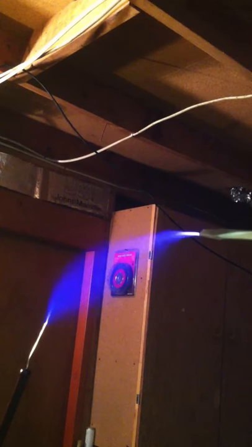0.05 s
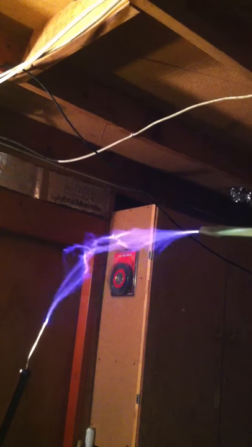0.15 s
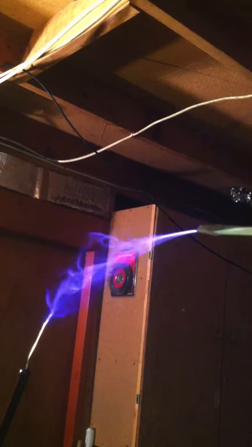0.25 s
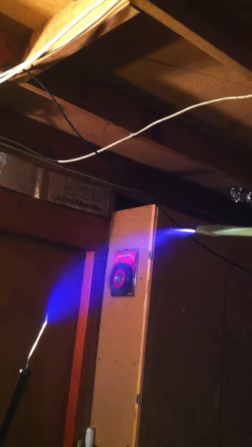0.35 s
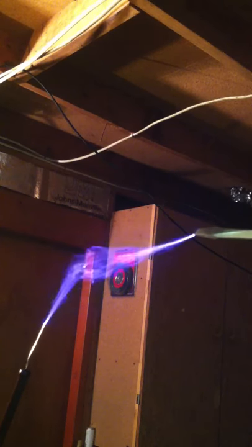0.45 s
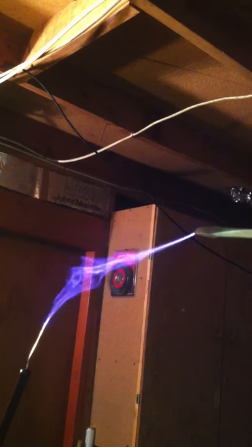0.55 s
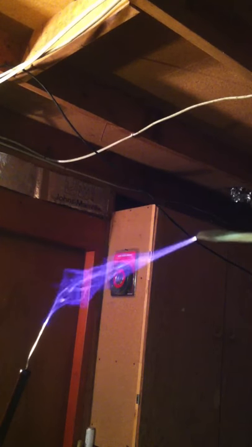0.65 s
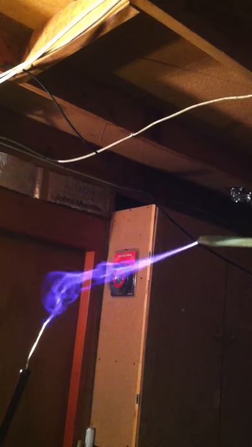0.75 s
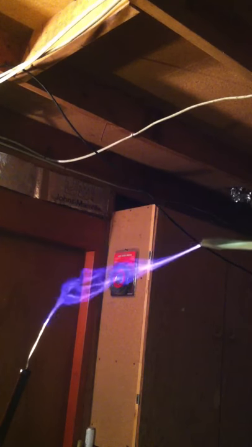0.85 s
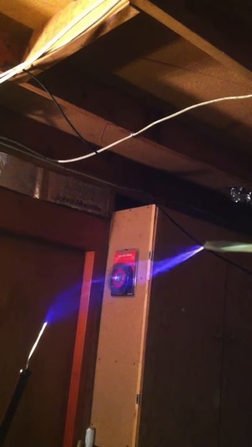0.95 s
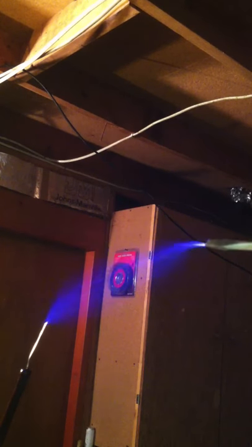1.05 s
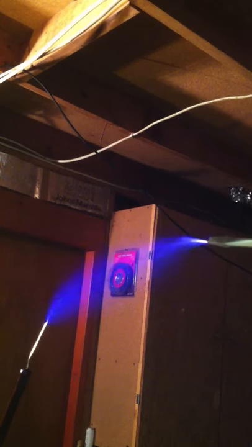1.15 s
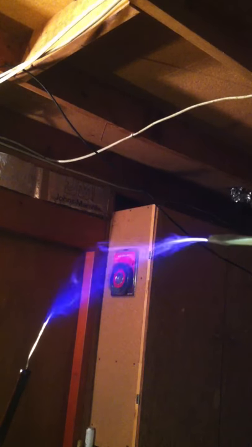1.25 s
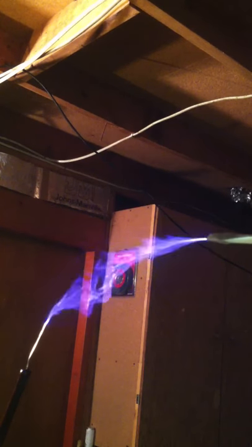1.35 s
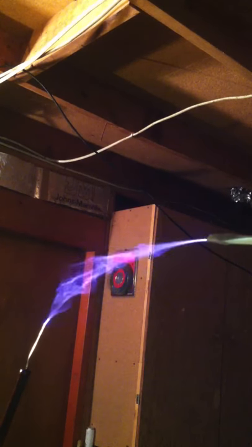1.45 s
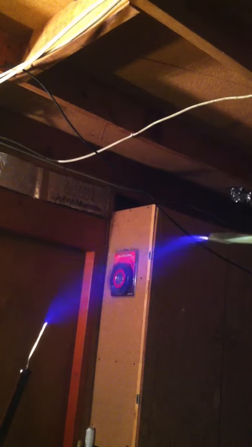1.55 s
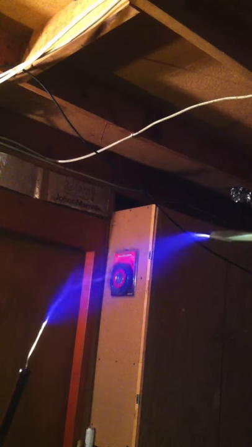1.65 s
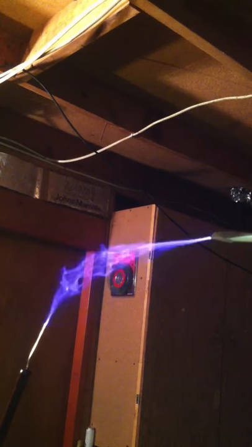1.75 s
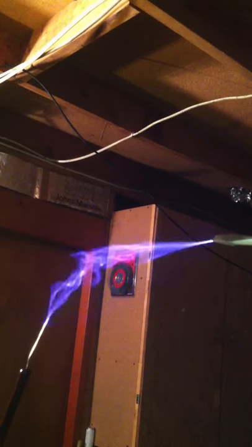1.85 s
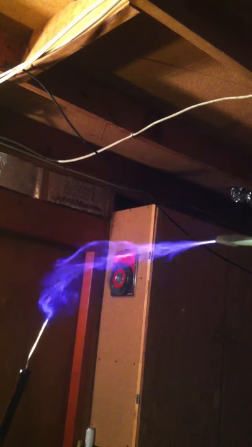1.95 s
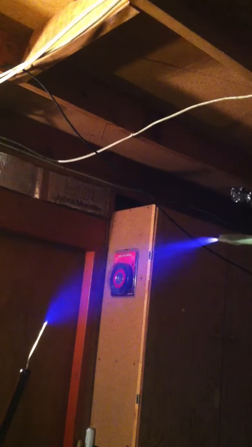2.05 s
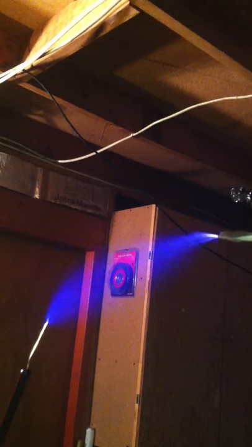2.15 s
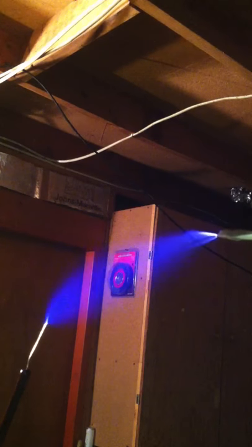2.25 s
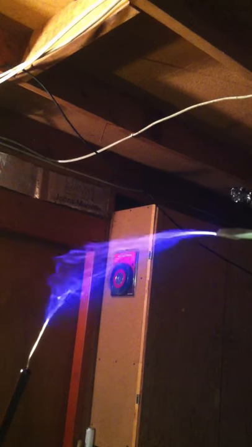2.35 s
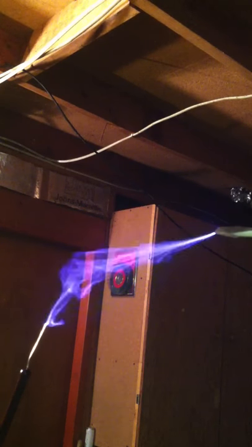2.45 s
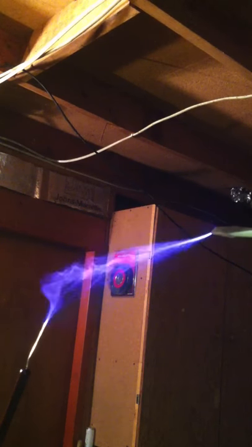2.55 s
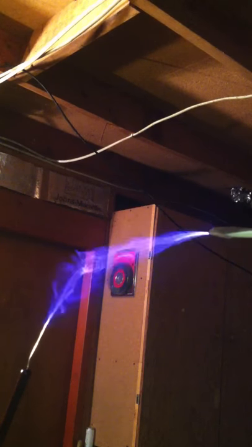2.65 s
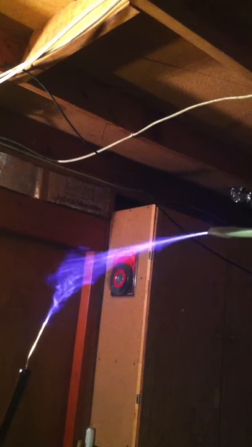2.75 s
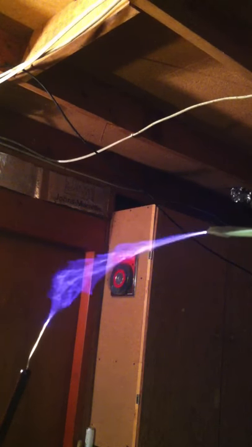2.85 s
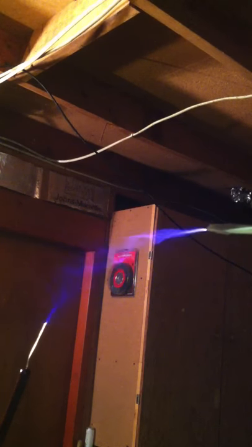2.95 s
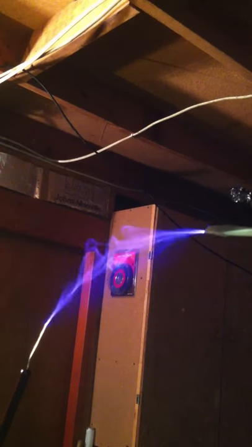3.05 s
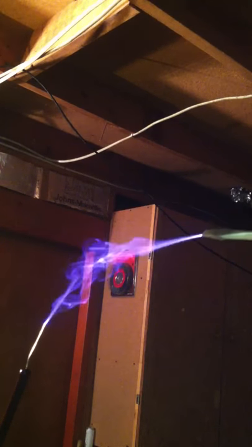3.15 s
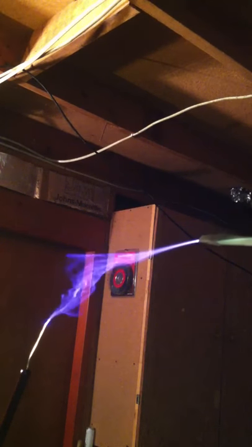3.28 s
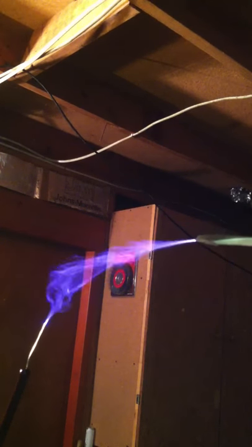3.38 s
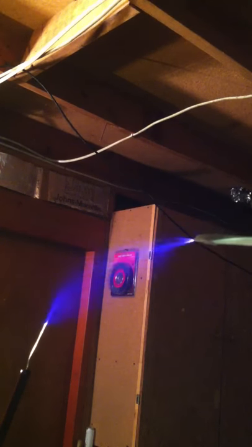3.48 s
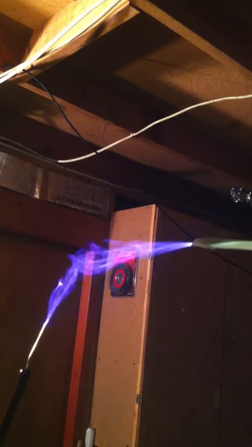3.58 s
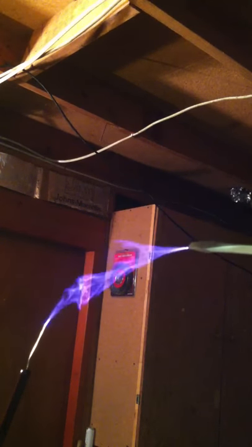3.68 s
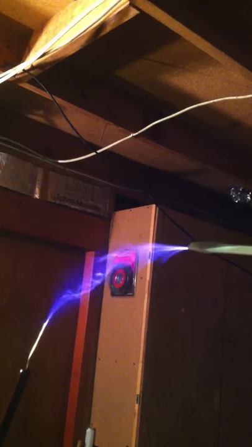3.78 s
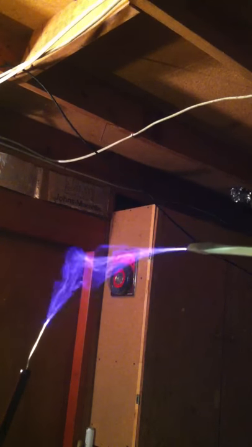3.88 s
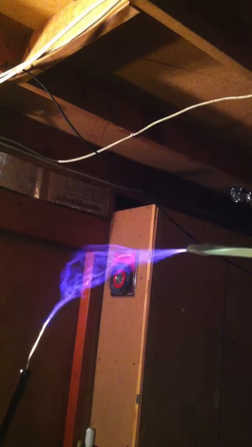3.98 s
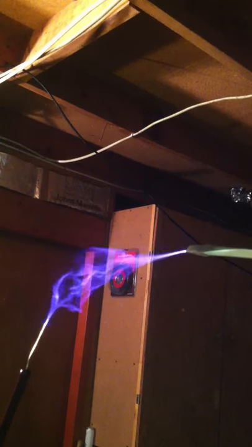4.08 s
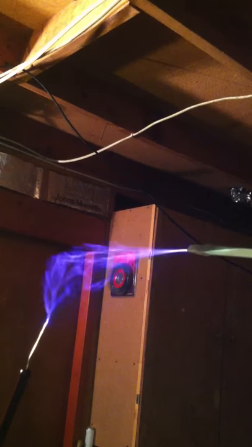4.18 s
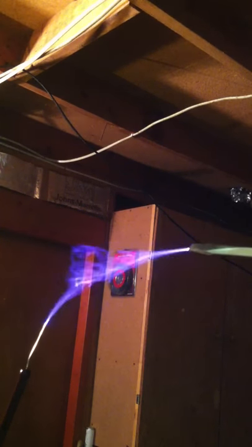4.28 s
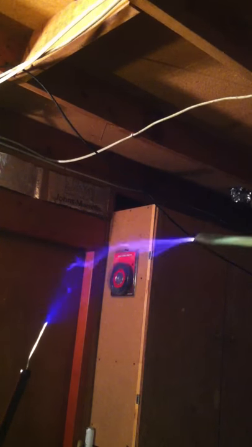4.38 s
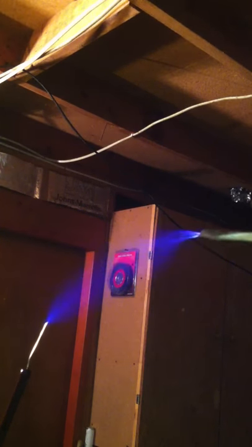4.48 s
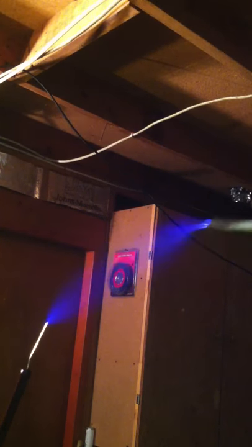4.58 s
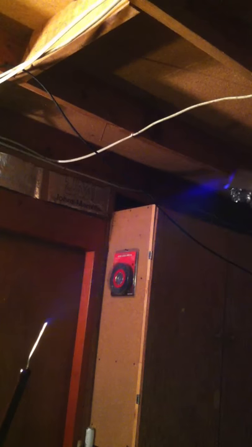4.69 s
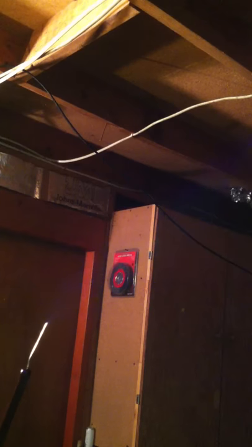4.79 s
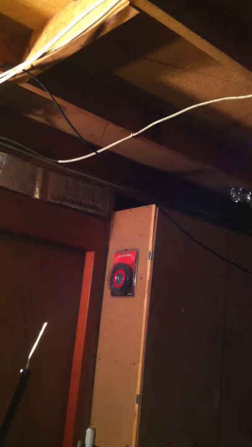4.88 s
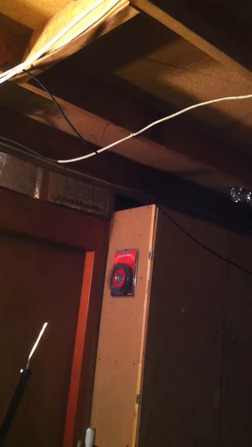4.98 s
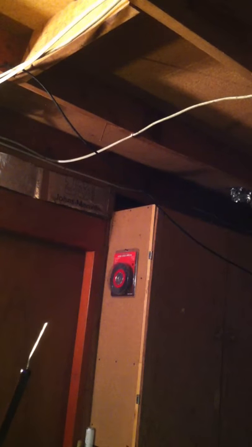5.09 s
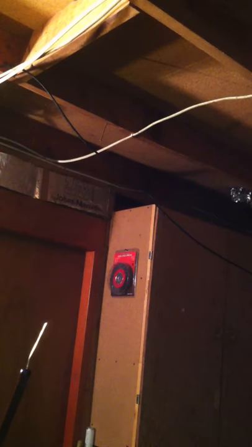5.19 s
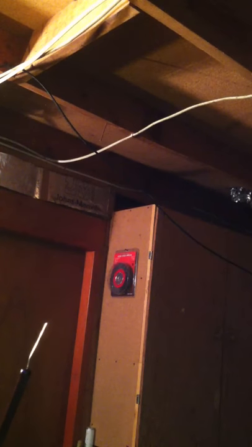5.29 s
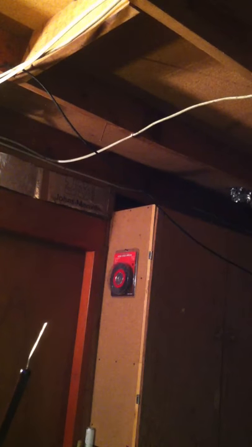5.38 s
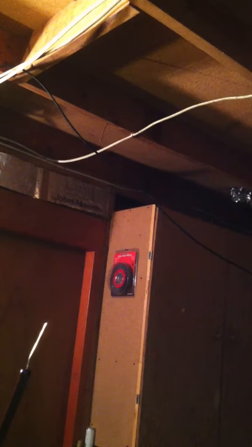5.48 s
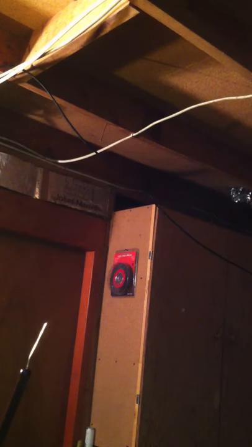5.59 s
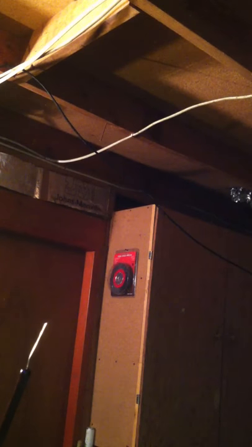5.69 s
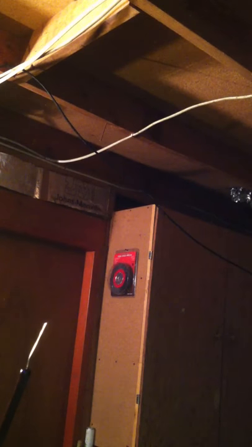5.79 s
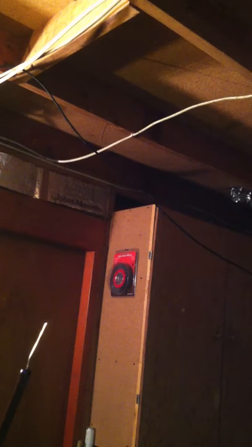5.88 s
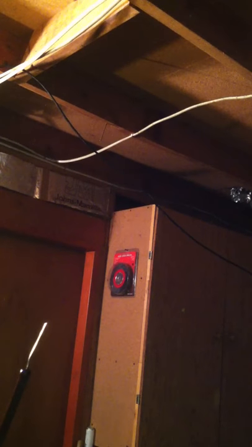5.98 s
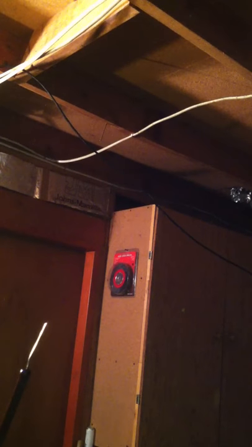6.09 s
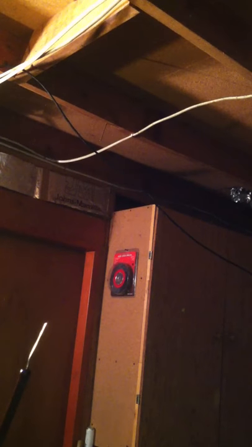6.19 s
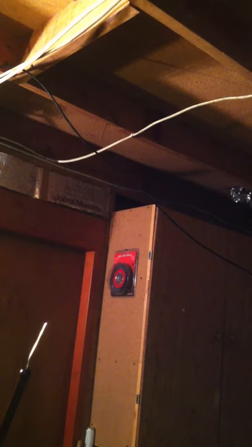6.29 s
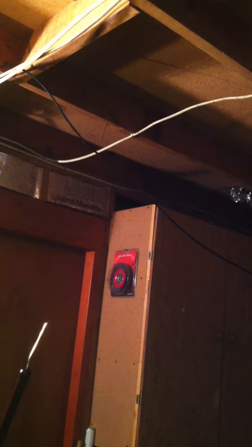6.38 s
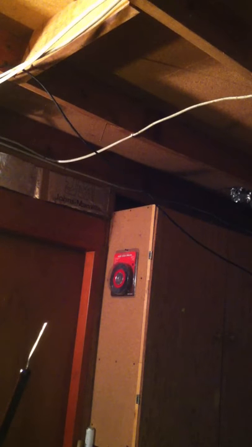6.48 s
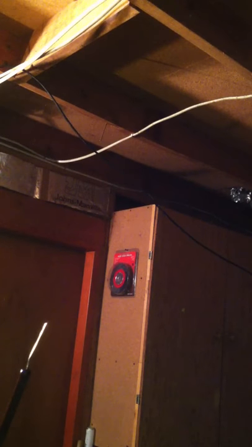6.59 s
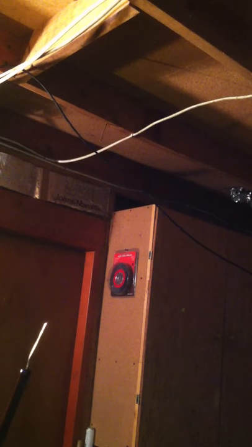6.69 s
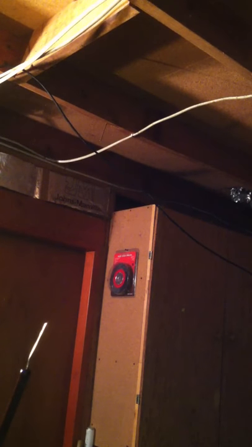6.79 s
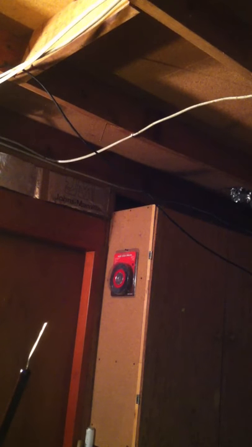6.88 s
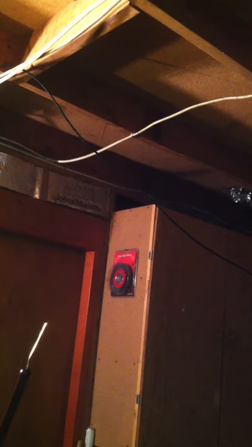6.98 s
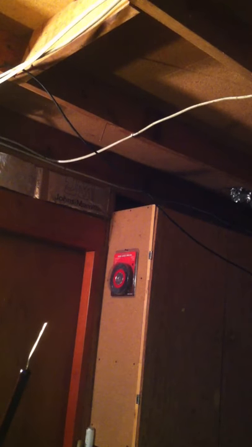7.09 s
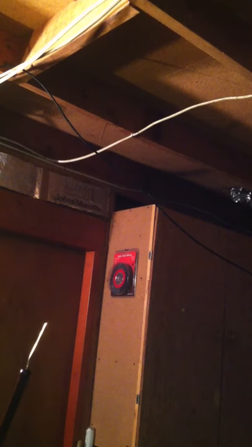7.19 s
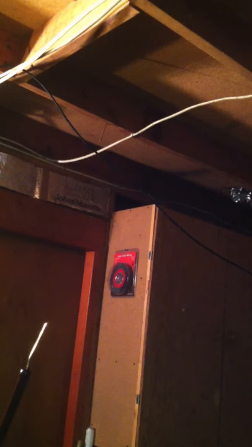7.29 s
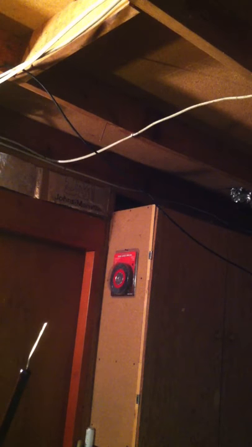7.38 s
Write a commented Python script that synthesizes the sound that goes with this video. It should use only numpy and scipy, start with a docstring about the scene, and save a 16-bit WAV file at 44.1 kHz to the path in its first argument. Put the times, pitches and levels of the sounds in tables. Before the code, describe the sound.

A high-voltage arc plays close to the microphone in a timber basement, over a quiet, slightly wavering fan whirr, soft air noise and thin mains buzz. From 0 to 0.55 s, quick ripping zaps tumble together with gritty sizzle and snaps. It drops to faint fizz and stray ticks, then a burn from 1.04 swells, throbbing at mains rate, and snaps off at 1.3. Dense, loud rips and crackling follow until 1.93; another burn runs 2.06 to 2.46, then a tight cluster of zaps until 2.8. Separate sizzling burns start around 3.04, 3.54, 3.9, 4.2 and 4.5, with sharp snaps and soft air thumps. The last collapses at 4.7. At 4.83 a smooth hiss flares and quickly sinks to a whisper, with a faint tick at 5.3, fading out just after 5.45. Only the fan and buzz remain until about 7.5 s. Echoes are short and dull.

```python
"""Timber basement: a high-voltage discharge between a fixed rod and a hand-held probe, over a fan and mains hum.
At first flash-overs rip for a few ms, as rushes of small shocks, each with a soft thump of pushed air.
Between them a brush of streamers sizzles, a bed of finer shocks throbbing with the mains ripple, and ends in snaps.
Late on the probe is drawn away: a hiss of filtered noise flares, sinks to a whisper with a faint tick, and stops.
Fan tones, air noise and a thin buzz run from start to end; a close surface and the room return echoes."""
import sys
import numpy as np
from scipy import signal
from scipy.fft import rfft, irfft
from scipy.io import wavfile
from scipy.ndimage import uniform_filter1d

SR = 44100
rng = np.random.default_rng(int(sys.argv[2]) if len(sys.argv) > 2 else 0)


def to_wav(s):
    """Save 16-bit WAV."""
    ch = np.atleast_2d(s).T  # columns
    pcm = np.round(np.clip(ch, -1, 1) * 32767)  # PCM
    wavfile.write(sys.argv[1], SR, pcm.astype(np.int16))


N = 328104
TIME = np.arange(N) / SR
MAINS_HZ, FAN_HZ = 60, 43.83  # ripple rate; fan shaft turns per second
TOP_HZ = 15800  # upper edge of the microphone channel

# Fan tones, as orders of the shaft: order [multiple of FAN_HZ], level_db [dB rms]
FAN_ORDERS = [(4, -73), (5, -67), (6, -59), (8, -70.5), (10, -58.5), (12, -66), (14, -70.5)]
# Mains buzz: harmonic [multiple of MAINS_HZ], level_db [dB rms]
BUZZ_HARMONICS = [(14, -70), (20, -75), (28, -74.5)]
# Spectrum of the fan's rush of air: pitch_hz [Hz], density_db [dB per Hz, relative]
AIR_SPECTRUM = [(25, -32.5), (60, -30), (110, -15), (190, -5.5), (260, -2), (420, -1.5), (570, -7),
                (880, -6), (1150, -11.5), (1700, -12), (2200, -15.5), (5000, -23), (10000, -28.5),
                (15500, -29.5)]
# Spectrum of the hiss of the leaving probe: pitch_hz [Hz], density_db [dB per Hz, relative]
CORONA_SPECTRUM = [(100, -31), (1200, -8), (2000, -5), (4000, -1), (8000, -1.5), (15500, -5.5)]
# Spectrum of sparks, ticks and crackle: pitch_hz [Hz], density_db [dB per Hz, relative]
SNAP_SPECTRUM = [(25, -13.5), (110, -9.5), (300, 4.5), (1200, -0.5), (4000, 1.5), (8000, 3), (12000, 0.5),
                 (15500, -14)]
# Spectrum of the streamer brush: pitch_hz [Hz], density_db [dB per Hz, relative]
BRUSH_SPECTRUM = [(25, -26.5), (130, -14.5), (210, -0.5), (470, 4.5), (720, -1.5), (1150, 2.5), (1600, 1),
                  (2150, 1.5), (3200, -0.5), (5500, 4.5), (9000, 4), (15500, 1.5)]
# Spectrum of the flash-overs: pitch_hz [Hz], density_db [dB per Hz, relative]
STRIKE_SPECTRUM = [(25, -17), (120, -15.5), (220, -5.5), (450, 0.5), (720, -3), (1150, 0), (2100, -1.5),
                   (3200, -5), (5000, -1), (9000, 2), (15500, 3.5)]
# Faint fizz of the tips between burns: start_s [s], level_db [dB]
IDLE_FIZZ = [(0, -52.5), (.9, -61.5), (3.2, -59), (4.15, -54), (4.45, -72), (4.85, -54.5), (5.1, -82)]
# Loud stray sparks: start_s [s], level_db [dB, relative]
STRAY_SPARKS = [(.2795, -16), (.627, -14.5), (.6917, -24), (.7092, -23.5), (.7497, -22), (.7604, -20),
                (1.1466, -15), (1.4103, -9.5), (2.8546, -14.5), (2.8704, -22), (2.9638, -20.5),
                (3.129, -17), (3.2259, -18), (3.2405, -19), (3.2652, -17.5), (3.329, -25), (3.4436, -27),
                (3.716, -20), (3.8241, -26), (3.9975, -19.5), (4.0098, -17), (4.0452, -20)]
# Burns of the brush, each lit by the first flash-over after the last collapse:
# collapse_s [s], final_db [dB], throb [0-1], closing_snap_db [dB, relative], embers_db [dB against the burn]
BRUSH_BURNS = [(.222, -34, .1, -30, -7), (.3581, -34, .1, -14, -11), (.5308, -35, 0, -14, -7.5),
               (1.2962, -36, 0.9, -9, -33), (1.445, -37.5, 0.3, -30, -9.5), (1.781, -35.5, .7, -10, -16.5),
               (1.824, -39, .6, -14.5, -13), (1.9291, -37.5, 0.65, -7.5, -2),
               (2.4632, -32.5, 0.5, -9.5, -23), (2.5269, -35, .05, -4.5, -8), (2.664, -32.5, .05, -9, -20),
               (2.7397, -41, .05, -13, -12), (2.8102, -38, 0.2, -16, -7), (3.1768, -38, 1, -12, -6),
               (3.6463, -37.5, .45, -8, -6), (3.965, -36.5, .35, -30, -5.5), (4.2765, -36.5, 0.4, -11, -13),
               (4.3774, -43, 0, -18.5, -15), (4.705, -40.5, 1, -35, -6)]
# Flash-overs, and last a faint tick after the probe has left:
# start_s [s], length_s [s], level_db [dB, relative], body_db [dB, leaning to body or treble]
STRIKES_AND_TICK = [(.029, 0.0099, -23, -2), (.1415, 0.0025, -20.5, -2.5), (0.2153, .0076, -23.5, -3.5),
                    (0.337, 0.0068, -23, -1), (0.399, 0.0069, -22, -2), (.412, 0.003, -20, -1.5),
                    (1.037, .0075, -19.5, -7.5), (1.334, .016, -19, -5.5), (1.393, 0.005, -16.5, -4),
                    (1.4398, .0012, -18.5, 0), (1.601, 0.016, -20, -16), (1.786, 0.0042, -17, -7),
                    (1.854, 0.014, -14.5, -10.5), (2.062, 0.0036, -15.5, -8.5), (2.485, 0.01, -18.5, -8.5),
                    (2.578, 0.0034, -18, -7), (2.593, 0.0045, -28.5, 3), (2.603, 0.0062, -19.5, -0.5),
                    (2.697, 0.0053, -22, 2.5), (2.711, .003, -22.5, -1), (2.752, 0.016, -19, -7),
                    (3.036, 0.008, -19.5, -10.5), (3.542, 0.0074, -20, -6.5), (3.885, 0.011, -19, -4.5),
                    (3.96, 0.0029, -22, 0), (4.2, 0.016, -21, -6.5), (4.32, 0.011, -21.5, -6.5),
                    (4.5, 0.0067, -21, -16.5), (5.32, 0.0081, -50.5, -18)]


def undb(db):
    """Decibels to gain."""
    return 10 ** (np.asarray(db) / 20)


def unit(x):
    """Scale to rms 1."""
    return x / np.sqrt(np.mean(x ** 2))


def curve(rows):
    """Join (start_s, value) rows with straight lines."""
    return np.interp(TIME, *np.transpose(rows))


def walk(rate):
    """Smooth random wander with a spread near 1, from steps drawn at this rate in Hz."""
    k = int(SR / rate)
    steps = np.repeat(rng.standard_normal(N // k + 1), k)
    return 1.33 * uniform_filter1d(uniform_filter1d(steps, k), k)[:N]


def lowpass(x, hz):
    """Gentle two-pole low-pass."""
    return signal.sosfilt(signal.butter(2, min(hz, SR / 2 - 1), fs=SR, output="sos"), x)


def highpass(x, hz):
    """Gentle two-pole high-pass."""
    return signal.sosfilt(signal.butter(2, hz, "highpass", fs=SR, output="sos"), x)


def colour(x, points, size=4096):
    """Causal filter through (pitch_hz, density_db) points that keeps the power of white noise."""
    hz, db = np.transpose(points)
    f = np.maximum(np.fft.rfftfreq(size, 1 / SR), 1)
    gain = undb(np.interp(np.log(f), np.log(hz), db))
    # folding the cepstrum gives minimum phase: the response starts at once
    cepstrum = irfft(np.log(gain))
    cepstrum[1:size // 2] *= 2
    cepstrum[size // 2 + 1:] = 0
    response = irfft(np.exp(rfft(cepstrum)))
    return signal.fftconvolve(x, response / np.linalg.norm(response))[:N]


def clicks(rate, spread_db):
    """Tiny shocks of uneven size and sign at random moments, so many a second; rms 1."""
    fired = rng.random(N) < rate / SR
    size = undb(spread_db * np.clip(rng.standard_normal(N), -2, 2))
    return unit(fired * size * rng.choice([-1, 1], N))


def hum(air_db=-56.5, waver_db=1.0, wow=0.001984):
    """A fan whose tones swell and waver over its rush of air, and a thin mains buzz."""
    turns = np.cumsum(FAN_HZ * (1 + wow * walk(5))) / SR
    tones = np.zeros(N)
    for order, level_db in FAN_ORDERS:
        phase = 2 * np.pi * (order * turns + rng.random())
        tones += undb(level_db + waver_db * walk(10)) * np.sin(phase)
    for harmonic, level_db in BUZZ_HARMONICS:
        phase = 2 * np.pi * (harmonic * MAINS_HZ * TIME + rng.random())
        tones += undb(level_db + waver_db * walk(4.1)) * np.sin(phase)
    air = colour(rng.standard_normal(N), AIR_SPECTRUM) * undb(0.36 * walk(8))
    return np.sqrt(2) * tones + undb(air_db) * air  # root 2 turns rms into sine peak


def corona(start_s=4.825, rise_s=.02, peak_db=-43.5, fall_db_per_s=75, faint_db=-66.0,
           off_s=5.45, release_s=0.14):
    """A smooth hiss flares as the probe leaves and sinks to a faint whisper, which then stops."""
    age = np.maximum(TIME - start_s, 0)
    level = np.hypot(undb(peak_db - fall_db_per_s * age), undb(faint_db))
    gate = np.minimum(age / rise_s, 1) * np.exp(-np.maximum(TIME - off_s, 0) / release_s)
    return colour(rng.standard_normal(N), CORONA_SPECTRUM) * level * gate


def puffs(strength, swell_s=.012, puff_hz=85, puff_db=-54.0, churn_db=-39.5, churn_hz=100):
    """Each discharge pushes air aside with a soft low thump; the hot air churns while the brush burns."""
    out = undb(churn_db) * strength * unit(lowpass(rng.standard_normal(N), churn_hz))
    age = TIME[:SR // 8] / swell_s
    for start_s, _, level_db, _ in STRIKES_AND_TICK:
        eddies = lowpass(rng.standard_normal(len(age)) * age * np.exp(-age), puff_hz)
        first = max(int((start_s - swell_s) * SR), 0)
        out[first:first + len(age)] += undb(level_db + puff_db) * unit(eddies)
    return out


def snaps(snap_db=3.0, width_s=.000012, tick_db=-57.0, spit_db=-52.0, spit_hz=2300, stray_db=-62.0):
    """Stray and burn-ending sparks, each a shock of its own width; small sputter goes on near the probe."""
    shocks, offsets = np.zeros(N), np.arange(-16, 17)
    closing = [(collapse_s, level_db) for collapse_s, _, _, level_db, _ in BRUSH_BURNS]
    sparks = list(STRAY_SPARKS) + closing
    widths = width_s * rng.uniform(.6, 1.6, len(sparks))
    for (start_s, level_db), width in zip(sparks, widths):
        shock = np.exp(-.5 * (offsets / (SR * width)) ** 2)
        shocks[int(start_s * SR) + offsets] += undb(level_db + snap_db) * shock / np.linalg.norm(shock)
    probe_near = curve([(4.3, 0.92), (4.6, 0.0049)])
    ticks = undb(tick_db) * clicks(rate=220, spread_db=7.0)
    strays = undb(stray_db) * clicks(rate=13.5, spread_db=1.5)
    spits = undb(spit_db) * unit(lowpass(clicks(rate=180, spread_db=2.0), spit_hz))
    sputter = highpass((ticks + strays + spits) * probe_near, 700)
    return colour(shocks + sputter, SNAP_SPECTRUM)


def burning(attack_s=0.021, swell_db_per_s=14, throb_fade_s=0.42, collapse_fall_s=0.018, ember_s=0.1):
    """Brush strength and throb: a burn swells as the air heats, its throb fades, then embers die slowly."""
    power = undb(curve(IDLE_FIZZ)) ** 2
    throb, last_s = np.zeros(N), 0
    for collapse_s, final_db, depth, _, embers_db in BRUSH_BURNS:
        lit_s = min([row[0] for row in STRIKES_AND_TICK if row[0] > last_s], default=last_s)
        age, after = np.maximum(TIME - lit_s, 0), np.maximum(TIME - collapse_s, 0)
        still_to_swell = swell_db_per_s * np.maximum(collapse_s - TIME, 0)
        swell = np.minimum(age / attack_s, 1) * undb(final_db - still_to_swell)
        embers = undb(embers_db)
        # a fast drop, then a slow glow
        release = (1 - embers) * np.exp(-after / collapse_fall_s) + embers * np.exp(-after / ember_s)
        burn = (swell * release) ** 2
        power = power + burn
        throb = throb + burn * depth * np.exp(-(age / throb_fade_s) ** 2)
        last_s = collapse_s
    return np.sqrt(power), np.clip(throb / power, 0, 1)


def brush(strength, depth, crest=.64, streamer_db=-5.5, crackle_db=-7.0, streamer_hz=2700, tear_db=3.5):
    """Fine tearing hiss, fatter streamers that bunch on each ripple crest, and a sparse crackle."""
    ripple = np.cos(2 * np.pi * (MAINS_HZ * TIME - crest))  # crest in cycles
    tearing = tear_db * np.clip(walk(320), -2, 1)
    hiss = clicks(rate=7000, spread_db=4.5) * undb(tearing + 2 * depth * ripple)
    bunch = undb(13.5 * depth * ripple - 4.2 * depth)
    streamers = unit(lowpass(clicks(rate=1500, spread_db=4.0), streamer_hz)) * bunch
    crackle = clicks(rate=220, spread_db=5.0)
    sizzle = colour(strength * (hiss + undb(streamer_db) * streamers), BRUSH_SPECTRUM)
    return sizzle + undb(crackle_db) * colour(strength * crackle, SNAP_SPECTRUM)


def zip_train(age, length, first_hz=3200, last_hz=14500, jitter=0.18):
    """Steps of a growing channel follow each other ever faster: a short rising zip of rms near 1."""
    hz = last_hz - (last_hz - first_hz) * np.exp(-np.maximum(age, 0) / (.002 + .3 * length))
    uneven = np.repeat(rng.standard_normal(len(age)), 8)[:len(age)]  # held for 8 samples
    return np.sqrt(2) * np.sin(2 * np.pi * np.cumsum(hz * (1 + jitter * uneven)) / SR)


def strikes(fall_s=0.0028, linger=0.62, rise_s=0.000982, afterglow=0.59, ragged_db=3.5,
            body_hz=2600, zip_share=0.27):
    """A channel grows in a rush of small steps, then dies within a few ms; fat ones have body, thin ones zip."""
    steps = clicks(rate=20000, spread_db=4.0) * undb(ragged_db * walk(1500))
    # filtered both ways, so body and treble stay in step
    low = lowpass(lowpass(steps, body_hz)[::-1], body_hz)[::-1]
    out = np.zeros(N)
    for start_s, length_s, level_db, body_db in STRIKES_AND_TICK:
        near = slice(int((start_s - rise_s) * SR), int((start_s + length_s + .06) * SR))
        age = TIME[near] - start_s
        dying = afterglow * np.exp(-np.maximum(age - length_s, 0) / (fall_s + linger * length_s))
        shape = np.clip(1 + age / rise_s, 0, 1) * np.where(age < length_s, 1, dying)
        # the zip lasts only while the channel grows
        share = np.clip(-zip_share * body_db / 12, 0, .75) * (age < length_s)
        rush = np.sqrt(1 - share) * unit(steps[near] - low[near])
        treble = rush + np.sqrt(share) * zip_train(age, length_s)
        body = undb(0.69 * body_db - 3.5) * unit(shape * low[near])
        rip = unit(shape * treble) + body
        out[near] += undb(level_db) * np.sqrt(np.mean(shape ** 2)) * rip
    return colour(out, STRIKE_SPECTRUM)


def bounce(x, lag_s=0.000898, sway=0.071, gain=0.49, dull_hz=3600):
    """A dull echo from a surface close by; its lag shifts as the arc writhes."""
    lag = lag_s * (1 + sway * walk(11.0))
    dull = lowpass(lowpass(x, dull_hz), dull_hz)
    # five samples roughly make up for the delay of the filters
    return x + gain * np.interp(TIME - lag + 5 / SR, TIME, dull)


def basement(x, t60_low=0.52, t60_high=0.34, early_s=0.012, early_db=-11.5, tail_db=-15.5, bass_cut_hz=240):
    """A cluster of echoes from joists and walls, and a short tail; t60 in s."""
    t = TIME[:SR // 2]
    early, late = rng.standard_normal((2, len(t)))
    early = early * (t > .003) * np.exp(-t / early_s)
    low = lowpass(late, 4400)
    tail = (low * undb(-60 * t / t60_low) + late * undb(-60 * t / t60_high)) * (t > .008)
    early = undb(early_db) * early / np.linalg.norm(early)
    tail = undb(tail_db) * tail / np.linalg.norm(tail)
    # the echoes carry little bass
    echoes = highpass(early + tail, bass_cut_hz)
    return x + signal.fftconvolve(x, echoes)[:N]


def scene():
    """The discharge in the room, over the hum."""
    strength, depth = burning()
    arc = corona() + puffs(strength) + snaps() + brush(strength, depth) + strikes()
    return (hum() + basement(bounce(arc)))[None]


def record(dry, ceiling=0.71):
    """The microphone rounds the sharpest peaks; a steep low-pass cuts the top."""
    rounded = ceiling * np.tanh(dry / ceiling)
    return signal.sosfilt(signal.ellip(10, .2, 70, TOP_HZ, fs=SR, output="sos"), rounded)


dry = scene()
out = record(dry)
to_wav(out)
```